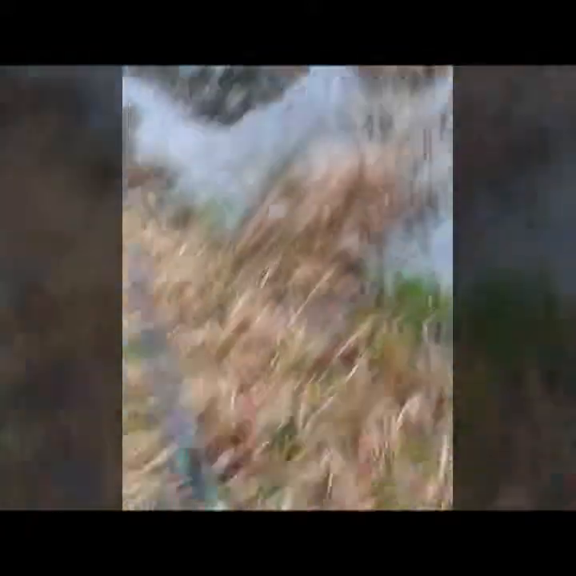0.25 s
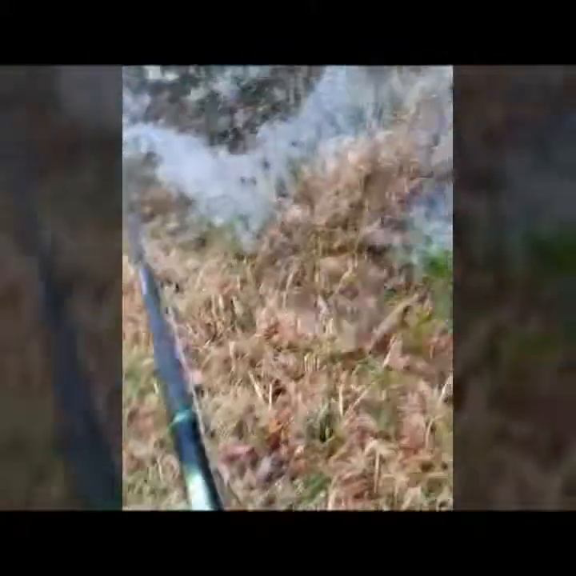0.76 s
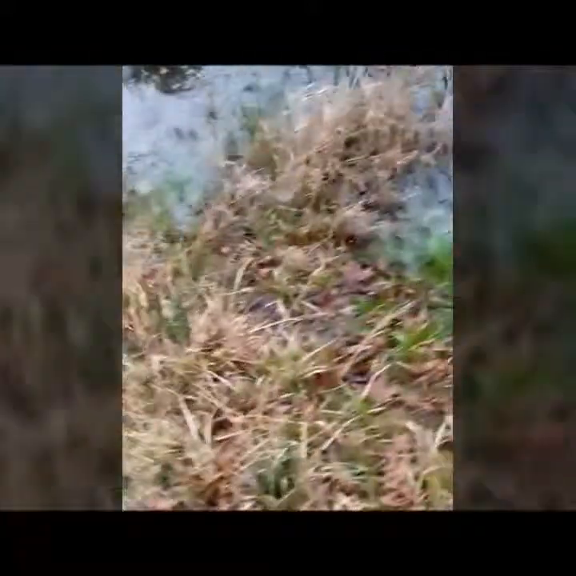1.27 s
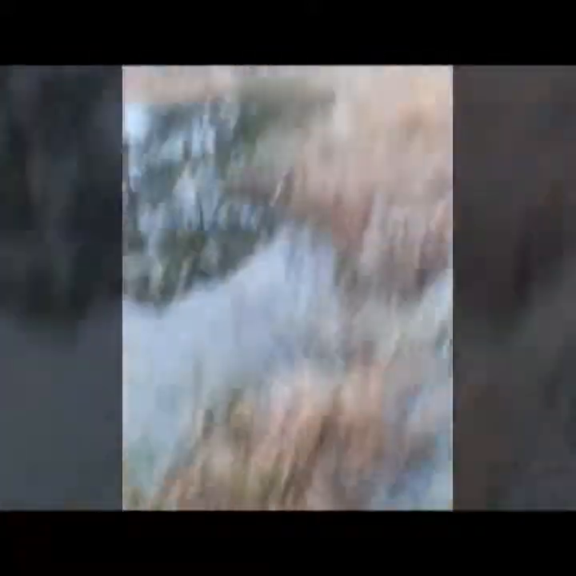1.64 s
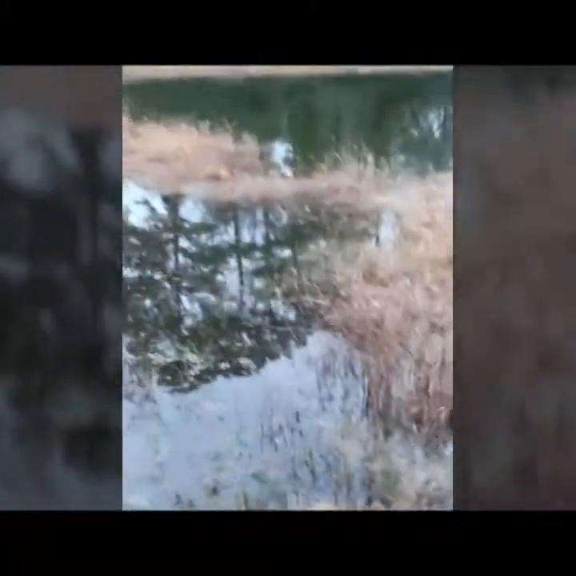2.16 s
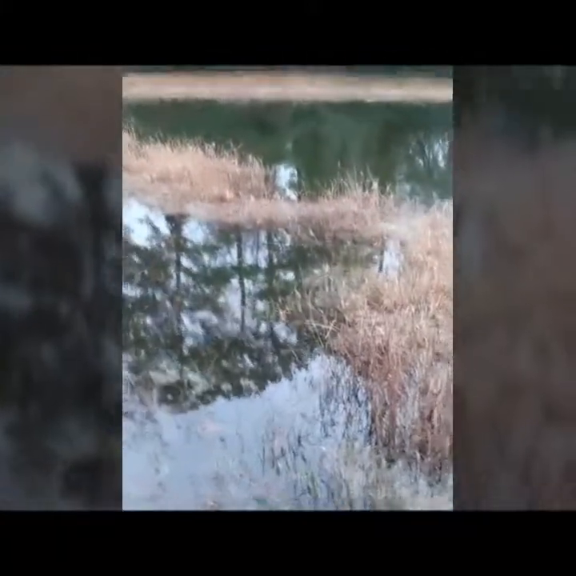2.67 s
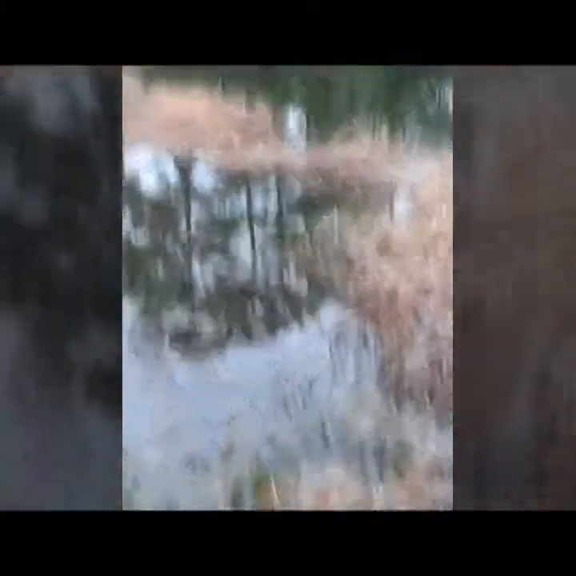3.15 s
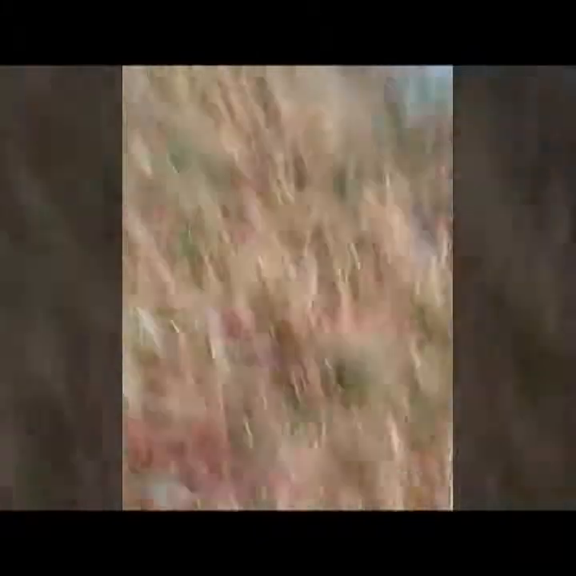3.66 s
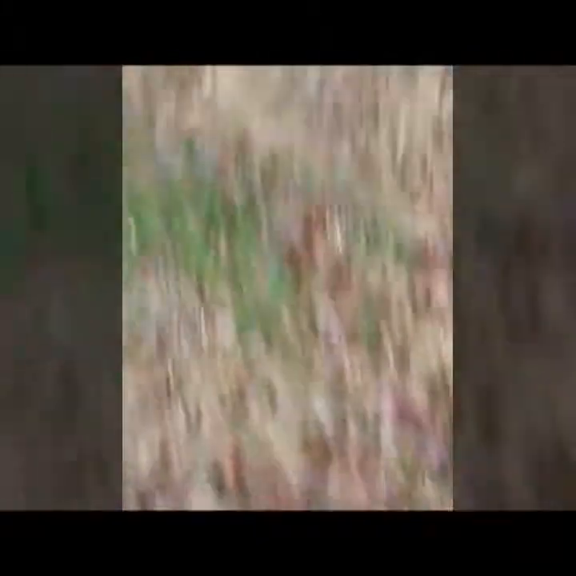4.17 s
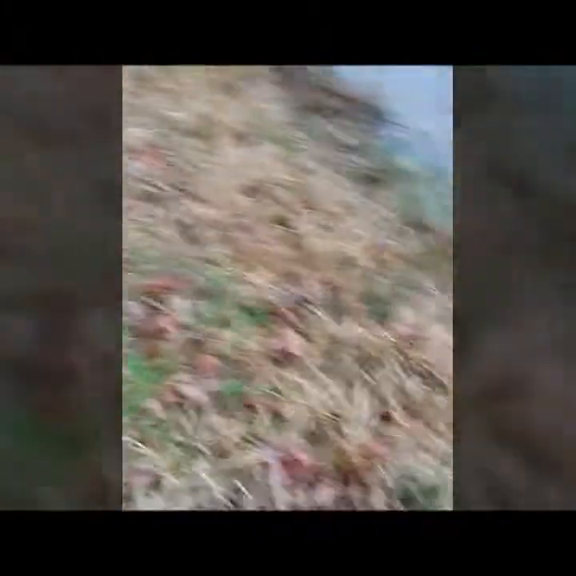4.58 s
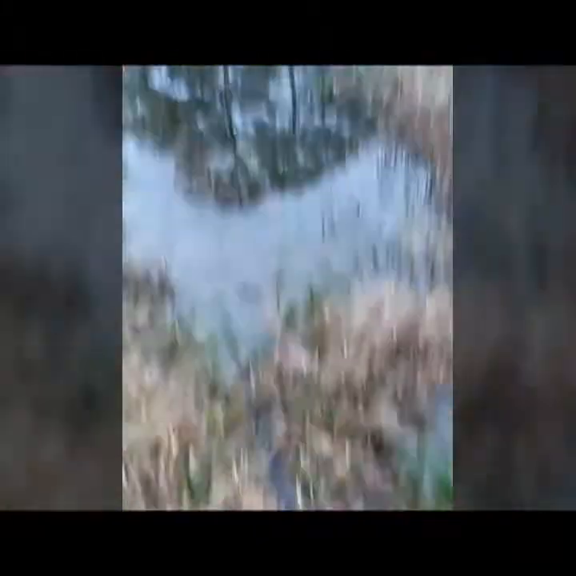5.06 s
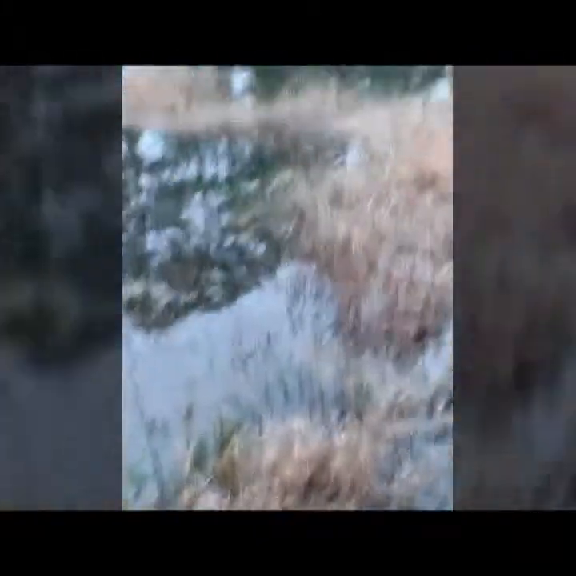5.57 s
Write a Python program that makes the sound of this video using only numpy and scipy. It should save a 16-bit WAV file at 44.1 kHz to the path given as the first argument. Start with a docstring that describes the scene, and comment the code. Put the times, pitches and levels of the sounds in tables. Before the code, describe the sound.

Someone shifts and steps through crisp grass outdoors while faint birds chirp and a far motor hums; handling scrapes and thumps interrupt twice.

```python
"""Steps in dry grass

Someone holding a phone shifts and steps in dry grass at the edge of a pond. Crackling noise makes the
stalks rustle, swelling with each push; short ringing bursts are snapping stalks and one click of the hand.
Twice the hand brushes over the microphone (filtered crackle); bumps wobble and click, and at the end the
hand dulls the distance. Small birds call in gliding whistles among echoing trees, and a far engine drones
in wavering sines under the shaped noise of the open air."""
import sys
import numpy as np
from scipy import signal
from scipy.fft import rfft, irfft
from scipy.io import wavfile
from scipy.ndimage import uniform_filter1d

SR = 44100
rng = np.random.default_rng(int(sys.argv[2]) if len(sys.argv) > 2 else 0)


def generate_wav(sig):
    """Save sig (samples, or channels by samples) to the path in sys.argv[1] as 16-bit PCM at SR."""
    pcm = np.round(np.clip(np.atleast_2d(sig).T, -1, 1) * 32767).astype(np.int16)
    wavfile.write(sys.argv[1], SR, pcm)


N = 256662
TIME = np.arange(N) / SR

# Every colour table sets a spectral shape only; its overall gain is levelled out by colour().
# open air: [f/Hz, relative level/dB]
AIR_COLOUR = [(25, -22), (42, -0.5), (60, 7), (120, 4.5), (180, 1.5), (300, -8), (560, -15.5), (800, -12.5),
              (1300, -19), (2100, -22.5), (3200, -27.5), (5000, -33), (8500, -39), (13000, -47.5)]
AIR_DB = -42

# far engine, firing rate: [t/s, f/Hz]
ENGINE_RATE = [(0, 100), (1.5, 97), (2.2, 96), (2.8, 93.5), (5.8, 95.5)]
# far engine, swell of the orders below the second: [t/s, level/dB]
ENGINE_LEVEL = [(0.04, -39), (0.2, -33), (0.33, -39), (0.47, -32), (0.53, -39), (0.86, -32), (1.25, -37.5),
                (1.39, -29), (3.06, -33), (3.25, -40.5), (3.55, -42.5), (3.85, -51), (4.15, -39.5),
                (5.4, -41.5), (5.8, -33.5)]
# engine orders: [multiple of the firing rate, relative level/dB, unsteadiness as a ratio]
ENGINE_ORDERS = [(.62, -14, 1.1), (1, 0, 0.11), (1.25, -9, 0.97), (2, -22, 1.1), (3, -22.5, 1.15),
                 (3.999, -34.5, 1.2)]
# the overtones are strongest when the engine is nearest
NEAREST_S, MELLOW_DB_PER_S, OVERTONES_DB = 1.31, 3.0, -30

# how the hand shades the microphone: [t/s, change of treble level/dB]
SHADE = [(0, -1.5), (.9, -1), (1.2, -2.5), (1.8, 0), (2.85, 1), (4.3, -1), (5.1, -1.5), (5.38, -6)]

BIRDS_DB = -0.5  # trim on all the near birds
# a bird note bends through its start, middle and end, as ratios of the note's pitch
ARCH_BEND, SLUR_BEND, FLICK_BEND = (.79, 0.97, .85), (.925, 1, 1.11), (.92, 0.96, 1.07)
CHIP_BEND, DROOP_BEND = (0.97, 0.98, 0.94), (1.05, 0.99, 0.98)
# one bird repeats an arched note, a little lower each time: [t/s, relative level/dB]
ARCHES = [(0.634, -45), (0.851, -44), (1.116, -46), (1.389, -55), (1.645, -50), (1.878, -46),
          (2.111, -48.5)]
ARCH_HZ, ARCH_SAG_HZ_PER_S, ARCH_S = 3350, 240, 0.0459
# low rising slurs, and one very short tick at 3.32 s:
# [t/s, length/s, f/Hz before the bend, relative level/dB]
SLURS_AND_TICK = [(0.365, 0.087, 2297, -53), (1.128, 0.14, 2377, -51.5), (1.605, .026, 2470, -46.5),
                  (1.827, 0.035, 2426, -47), (2.072, .03, 2370, -51), (3.146, 0.049, 2245, -53),
                  (3.32, .008, 2880, -49), (3.462, 0.037, 2150, -47.5), (3.744, 0.056, 2153, -44.5),
                  (4.193, .09, 2040, -58), (4.612, 0.044, 2250, -39.5), (4.921, 0.025, 2210, -44)]
# faint drooping whistles: [t/s, length/s, f/Hz before the bend, relative level/dB]
DROOPS = [(0, 0.029, 3090, -45.5), (1.442, .052, 2550, -57), (1.745, 0.032, 2413, -51),
          (2.542, 0.092, 2150, -59), (4.311, 0.21, 3040, -64)]
# a quick, even run of upward flicks that fades by RUN_FADE_DB a note
RUN_FROM_S, RUN_GAP_S, FLICK_S = 2.058, .112, 0.027
FLICK_HZ, RUN_DB, RUN_FADE_DB = 3780, -48.5, 2.1
# short chips in two voices: [t/s, relative level/dB, relative level of the high voice/dB]
CHIPS = [(.484, -56.5, -60), (1.523, -50, -54), (2.582, -49, -61), (3.775, -41, -61), (3.855, -45.5, -66)]
CHIP_HZ, CHIP_HIGH_HZ, CHIP_S = 3930, 5600, 0.0313
# a song that tumbles down one long glide: [t/s, relative level/dB, fall in octaves per s]
CASCADES = [(.016, -47, 3.45), (4.377, -47, 3.55)]
CASCADE_HZ = 4820  # where the glide starts
# syllables of that song: [delay/s, length/s, relative level/dB]
SYLLABLES = [(.008, .04, -3.5), (.106, .045, 0.5), (0.155, 0.038, -2.5), (0.206, 0.047, -2.5),
             (.272, 0.069, -4.5)]

# the air pocket under the finger whistles as it changes size:
# [t/s, level/dB before the swell, start f/Hz, end f/Hz]
POCKETS = [(3.616, -20, 1090, 4240), (5.188, -14.5, 1390, 4080), (5.5805, -27.5, 7020, 3500),
           (5.687, -40, 5700, 3580)]
# bumps on the phone: [t/s, push level/dB before the low cut, rise/s, click level/dB before colour]
BUMPS = [(.955, -25, 0.00024, -41), (3.5302, -46, 0.00022, -23), (3.616, -1.5, 0.0001, -31),
         (3.62, 7.5, 0.0053, -48), (3.711, -22, 0.00013, -31.5), (3.979, -5, .0011, -38.5),
         (5.188, -23, .0003, -27), (5.205, 7.5, 0.00046, -33), (5.213, 12, 0.0024, -43),
         (5.226, 5, .0025, -45), (5.239, 3.5, .00087, -26), (5.397, -23, .00048, -45),
         (5.581, 7.5, 0.00075, -16.5), (5.614, -8, 0.00045, -33), (5.685, 1.5, 0.00052, -29.5)]
# contact clicks: [f/Hz, relative level/dB]
CLICK_COLOUR = [(200, 3.5), (1000, 13.5), (2000, 1.5), (3000, -9), (4500, -11.5), (6000, -20),
                (8000, -25.5), (13000, -27)]

# a quick light brush of the hand over the microphone:
# [t/s, relative levels/dB of the rumble, the scrape and the hiss]
BRUSH = [(3.49, -48, -48, -57), (3.514, -42, -40, -42.5), (3.53, -37.5, -30, -31.5),
         (3.556, -51, -37, -42.5), (3.586, -24, -22, -43.5), (3.596, -19, -26.5, -45),
         (3.618, -14, -17, -37), (3.63, -33, -40, -43), (3.655, -54, -42.5, -71)]
# a heavier drag, with the same columns: [t/s, rumble/dB, scrape/dB, hiss/dB]
DRAG = [(5.025, -59, -69, -64), (5.049, -42, -41.5, -49.5), (5.087, -61, -41.5, -50.5),
        (5.131, -37.5, -24.5, -39.5), (5.159, -37, -28.5, -50), (5.191, -23.5, -22.5, -46),
        (5.207, -13, -34, -50), (5.223, -24, -44.5, -60), (5.281, -21.5, -43, -66), (5.349, -19, -38, -59),
        (5.367, -34, -48.5, -79), (5.38, -46, -74, -90)]
SCRAPE_DB, HISS_DB = -0.5, 5  # trims on both strokes
# hand right on the port: [f/Hz, relative level/dB]
RUMBLE_COLOUR = [(40, -3), (80, 2.5), (170, -3), (350, -10.5), (560, -15), (900, -22), (1500, -30),
                 (3000, -68.5)]
# hand near the port: [f/Hz, relative level/dB]
SCRAPE_COLOUR = [(300, -3), (800, -0.5), (1500, 0), (2800, -0.5), (4000, -3.5), (5200, -11.5), (7000, -31),
                 (12000, -61)]
# hand first touching the case: [f/Hz, relative level/dB]
HISS_COLOUR = [(1500, -6), (3000, -0.5), (4800, 9.5), (6300, 4), (8000, -3), (10500, -8), (13000, -13.5)]

# short bright ringing cracks: snapping stalks, and at 3.5175 s a click of the sliding hand:
# [t/s, relative level/dB, ring f/Hz, time to fall by 60 dB/s]
CRACKS = [(0.17, -34, 5740, 0.011), (.526, -46.5, 5070, 0.024), (0.957, -50, 7400, .056),
          (3.042, -27, 5100, 0.015), (3.074, -55, 5000, .03), (3.5175, -18, 6300, 0.013),
          (3.993, -36.5, 5300, 0.014), (4.313, -39.5, 9350, 0.019), (4.893, -22, 2950, 0.0073),
          (4.927, -27, 5440, .0069)]

# a foot pushes through the grass:
# [t/s of the firmest push, relative level/dB, length/s, crisp blade tips relative to the push/dB]
STEPS = [(0.167, -53, 0.085, -9), (0.266, -54, .13, -9), (0.66, -61, 0.25, -18), (1.673, -58.5, 0.29, -6.5),
         (3.092, -60.5, 0.13, -3), (3.51, -49, 0.11, -8), (3.752, -54.5, 0.34, -28),
         (3.992, -54, 0.066, -17), (4.162, -59, 0.1, 0.5), (5.052, -57, 0.34, -19)]
STEP_RISE_DB, STEP_FALL_DB = 21, 28.5  # swell and fade over one length
WALK_FROM_S, WALK_TO_S = 3.24, 5.2  # turning and walking along the bank
STANDING_DB, WALKING_DB = -86, -66  # stalks that keep stirring round the legs, relative
# rustling stalks: [f/Hz, relative level/dB]
STALK_COLOUR = [(300, -37), (1000, -6), (2500, -1.5), (5000, 8.5), (7000, 2.5), (10000, -0.5),
                (13000, -20.5)]
TIPS_HZ = 8100  # the blade tips crackle above this
TOP_HZ = 13300  # upper limit of the blade tips and of the phone


def undb(db):
    """Decibels to an amplitude ratio."""
    return 10 ** (np.asarray(db) / 20)


def unit(x):
    """Bring a signal to an RMS of 1."""
    return x / np.sqrt(np.mean(x ** 2) + 1e-20)


def curves(rows):
    """The columns of a table as values for every sample."""
    s, *columns = np.transpose(rows)
    return [np.interp(TIME, s, c) for c in columns]


def add(track, s, sound):
    """Mix a sound in at a time."""
    i = max(int(s * SR), 0)
    track[i:i + len(sound)] += sound[:max(N - i, 0)]


def butter(x, hz, kind, order=2):
    """Smooth filter with no ripple in its pass band."""
    sos = signal.butter(order, np.minimum(hz, SR * .45), kind, fs=SR, output="sos")
    return signal.sosfilt(sos, x)


def colour(x, points):
    """Causal filter through (Hz, dB) points, with a mean power gain of 1."""
    hz, db = np.transpose(points)
    bins = np.linspace(1, SR / 2, 4097)
    gain = unit(undb(np.interp(np.log(bins), np.log(hz), db)))
    # folding the cepstrum gives minimum phase: nothing sounds early
    cepstrum = irfft(np.log(gain))
    half = len(cepstrum) // 2
    cepstrum[1:half] *= 2
    cepstrum[half + 1:] = 0
    impulse = irfft(np.exp(rfft(cepstrum)))
    return signal.fftconvolve(x, impulse)[:len(x)]


def walk(rate):
    """Smooth random drift with an RMS of 1, from about rate new values a second."""
    k = max(int(SR / rate), 2)
    held = np.repeat(rng.standard_normal(N // k + 1), k)
    smooth = uniform_filter1d(uniform_filter1d(held, k), k)
    return unit(smooth[:N])


def crackle(rate, spread_db, smooth):
    """Tiny fractures of unequal size, so many a second, over a smooth share of friction noise."""
    sizes = undb(spread_db * np.minimum(rng.exponential(size=N), 4))
    clicks = (rng.random(N) < rate / SR) * sizes * rng.choice([-1, 1], N)
    return unit(unit(clicks) + smooth * rng.standard_normal(N))


def trees(x, t60):
    """Scattered echoes from the trunks and the bank, falling 60 dB in t60 seconds."""
    t = TIME[:SR]
    tail = rng.standard_normal(SR) * undb(-60 * t / t60) * (1 - np.exp(-t / .012))
    return signal.fftconvolve(x, tail / np.linalg.norm(tail))[:N]


def shaded(x):
    """The hand over the port changes the treble of everything that comes from afar."""
    treble_db, = curves(SHADE)
    low = butter(x, 340, "lowpass", order=1)
    return low + undb(treble_db) * (x - low)


def air():
    """Far traffic and wind in the trees; narrow middle bands come and go on their own."""
    bed = unit(colour(rng.standard_normal(N), AIR_COLOUR))
    murmur = 0
    for hz in np.geomspace(400, 2000, 12):
        band = butter(bed, [hz / 1.05, hz * 1.05], "bandpass", order=1)
        murmur = murmur + walk(9) * band
    return (bed + 0.37 * murmur) * undb(AIR_DB + .5 * walk(6.3))


def engine():
    """Only the lowest orders carry this far; each wavers on its way through the air."""
    hz, = curves(ENGINE_RATE)
    bass_db, = curves(ENGINE_LEVEL)
    phase = 2 * np.pi * np.cumsum(hz) / SR
    # the overtones fade with time away from the nearest moment
    overtone_db = OVERTONES_DB - MELLOW_DB_PER_S * np.abs(TIME - NEAREST_S)
    out = 0
    for multiple, order_db, unsteady in ENGINE_ORDERS:
        # the complex drift moves both level and phase
        waver = 1 + unsteady * (walk(21.87) + 1j * walk(21.85))
        waver = waver / np.sqrt(1 + 2 * unsteady ** 2)
        # ground echoes make the bass swell and sink; the overtones stay more even
        level_db = bass_db if multiple < 2 else overtone_db
        tone = np.sqrt(2) * np.imag(waver * np.exp(1j * multiple * phase))
        out = out + undb(order_db + level_db) * tone
    return out


def chorus(count):
    """Birds deeper in the wood: random slurs that arrive only as echo."""
    out = np.zeros(N)
    for when, length, pitch, slope in rng.random((count, 4)):
        u = np.linspace(0, 1, int((.03 + .05 * length) * SR))
        hz = 1850 * 2 ** (.5 * pitch + .7 * (slope - .5) * u)
        whistle = np.sin(2 * np.pi * np.cumsum(hz) / SR)
        add(out, when * N / SR, np.sin(np.pi * u) * whistle)
    return undb(-68) * unit(trees(out, .3))


def flicks(count):
    """The notes of the quick run, each softer than the last."""
    pitches = FLICK_HZ * np.array(FLICK_BEND)
    return [(RUN_FROM_S + k * RUN_GAP_S, FLICK_S, pitches, RUN_DB - k * RUN_FADE_DB)
            for k in range(count)]


def notes():
    """The near phrases as notes: (t/s, length/s, three pitches f/Hz, relative level/dB)."""
    song = []
    for s, db in ARCHES:
        hz = ARCH_HZ - ARCH_SAG_HZ_PER_S * (s - ARCHES[0][0])
        song.append((s, ARCH_S, hz * np.array(ARCH_BEND), db))
    song += [(s, length, hz * np.array(SLUR_BEND), db) for s, length, hz, db in SLURS_AND_TICK]
    song += [(s, length, hz * np.array(DROOP_BEND), db) for s, length, hz, db in DROOPS]
    song += flicks(count=5)
    for s, db, high_db in CHIPS:
        song.append((s, CHIP_S, CHIP_HZ * np.array(CHIP_BEND), db))
        song.append((s, CHIP_S, CHIP_HIGH_HZ * np.array(CHIP_BEND), high_db))
    for s, db, fall in CASCADES:
        for delay, length, accent_db in SYLLABLES:
            elapsed = delay + length * np.array([0, .5, 1])
            song.append((s + delay, length, CASCADE_HZ * 2 ** (-fall * elapsed), db + accent_db))
    return song


def birds():
    """Each note is a slightly husky whistle on a bent glide; the trees smear it."""
    out, quaver = np.zeros(N), 1 + .018 * walk(600)
    for s, length, pitches, db in notes():
        u = np.linspace(0, 1, int(length * SR))
        # a parabola through the start, middle and end pitches
        hz = np.polyval(np.polyfit([0, .5, 1], pitches, 2), u)
        hz = hz * quaver[max(int(s * SR), 0):][:len(u)]
        swell = np.sqrt(np.abs(np.sin(np.pi * u)))
        add(out, s, undb(db) * swell * np.sin(2 * np.pi * np.cumsum(hz) / SR))
    out = out * undb(2 * walk(150))
    echoes = undb(-7) * trees(out, .08) + undb(-10) * trees(out, .7)
    return undb(BIRDS_DB) * (out + echoes) + chorus(count=60)


def pockets():
    """Trapped air gives a few milliseconds of whistle that shoots to its last pitch."""
    out, t = np.zeros(N), TIME[:SR // 30]
    for s, db, start, end in POCKETS:
        hz = end + (start - end) * np.exp(-t / 0.00208)
        swell = t / 0.0034 * np.exp(1 - t / 0.0017)  # tops out at one half
        add(out, s, undb(db) * swell * np.sin(2 * np.pi * np.cumsum(hz) / SR))
    return out


def bumps():
    """A finger traps air over the port; the microphone's steep low cut makes each push a slowing wobble."""
    pushes, clicks, t = np.zeros(N), np.zeros(N), TIME[:SR // 4]
    lead = .02  # s of room for the rise ahead of the bump
    for s, push_db, rise, click_db in BUMPS:
        onset = (1 + np.tanh((t - lead) / rise)) / 2
        leak = np.exp(-np.maximum(t - lead, 0) / 0.0047)
        add(pushes, s - lead, undb(push_db) * onset * leak)
        # the skin goes on creaking faintly after the click
        fade = np.exp(-t / 0.0015) + 0.25 * np.exp(-t / 0.022)
        add(clicks, s, undb(click_db) * rng.standard_normal(len(t)) * fade)
    wobble = butter(butter(pushes, 60, "highpass", order=4), 36.4, "highpass", order=4)
    return wobble + colour(clicks, CLICK_COLOUR)


def stroke(rows, body_hz, weight_db):
    """Skin and cloth stick and slip: hiss on the case, scrape near the port, rumble right on it."""
    rumble_db, scrape_db, hiss_db = curves(rows)
    touching = uniform_filter1d(1. * (TIME > rows[0][0]) * (TIME < rows[-1][0]), size=400)
    slips = undb(1.2 * walk(400))
    # a light touch leaves out the rumble under body_hz
    rumble = butter(colour(crackle(2500, 1.44, 1.0), RUMBLE_COLOUR), body_hz, "highpass", order=3)
    scrape = colour(crackle(3000, 1.8, 0.5), SCRAPE_COLOUR)
    hiss = colour(crackle(2000, 1.8, 1.0), HISS_COLOUR)
    friction = unit(scrape) * undb(scrape_db + SCRAPE_DB) + unit(hiss) * undb(hiss_db + HISS_DB)
    return touching * (slips * friction + unit(rumble) * undb(rumble_db + weight_db))


def strokes():
    """A quick light brush, then a heavier drag with more low rumble."""
    return stroke(BRUSH, body_hz=120, weight_db=-0.5) + stroke(DRAG, body_hz=39.8, weight_db=5)


def cracks():
    """Snapping stalks and one click of the sliding hand: a sharp noise burst with a brief, broad ring."""
    out, t = np.zeros(N), TIME[:SR // 10]
    for s, db, hz, decay in CRACKS:
        burst = rng.standard_normal(len(t))
        ring = unit(butter(burst, [hz / 1.29, hz * 1.05], "bandpass", order=1))
        envelope = (1 - np.exp(-t / 0.00087)) * undb(db - 60 * t / decay)
        add(out, s, (ring + 0.1 * burst) * envelope)
    out = butter(out, 890, "highpass")
    return out + undb(-10.0) * trees(out, 0.16)


def grass():
    """Dry blades bend and crack under the shoes; each push swells, dies away and flicks the crisp tips."""
    walking = uniform_filter1d(1. * (TIME > WALK_FROM_S) * (TIME < WALK_TO_S), size=SR // 5)
    power = undb(STANDING_DB + (WALKING_DB - STANDING_DB) * walking) ** 2
    crisp = 0
    for s, db, length, tips_db in STEPS:
        u = (TIME - s) / length
        push = undb(db - np.maximum(-STEP_RISE_DB * u, STEP_FALL_DB * u))
        power = power + push ** 2
        crisp = crisp + push * undb(tips_db)
    stalks = unit(colour(crackle(900, 2.1, 1.0), STALK_COLOUR))
    tips = unit(butter(crackle(500, 3.5, .35), [TIPS_HZ, TOP_HZ], "bandpass"))
    bunches = undb(1.5 + 1.54 * walk(63))  # small and uneven
    return (stalks * np.sqrt(power) + tips * crisp) * bunches


def scene():
    """One channel below 4 kHz; above that, the two ports hear slightly different sound."""
    far = shaded(air() + birds() + engine())
    mid = far + grass() + cracks() + strokes() + bumps() + pockets()
    # fresh random draws of the same layers set the two sides apart
    diffuse = shaded(air()) + grass() + .5 * cracks() + strokes()
    side = undb(-7.5) * butter(diffuse, 4000, "highpass", order=12)
    return np.array([mid + side, mid - side])


def record(dry):
    """The phone rounds off the very highest peaks and cuts the top."""
    limited = dry / (1 + dry ** 6) ** (1 / 6)
    top_cut = signal.ellip(10, .2, 80, TOP_HZ, fs=SR, output="sos")
    return signal.sosfilt(top_cut, limited)


dry = scene()
out = record(dry)
generate_wav(out)
```